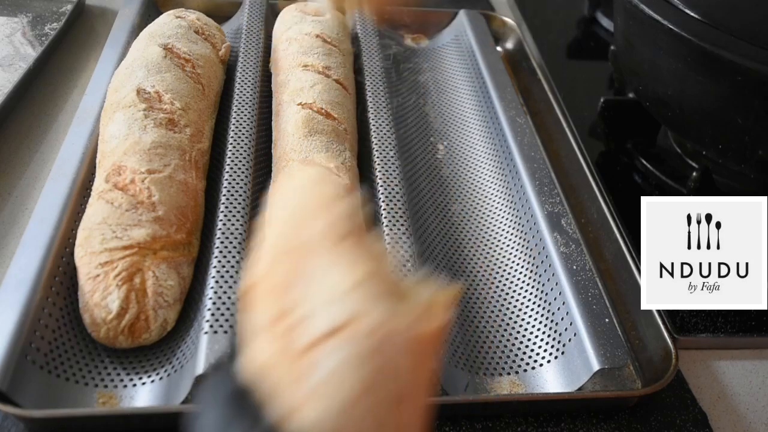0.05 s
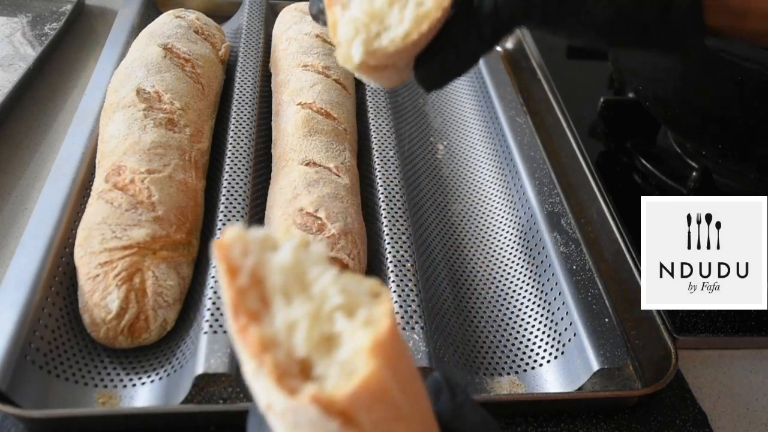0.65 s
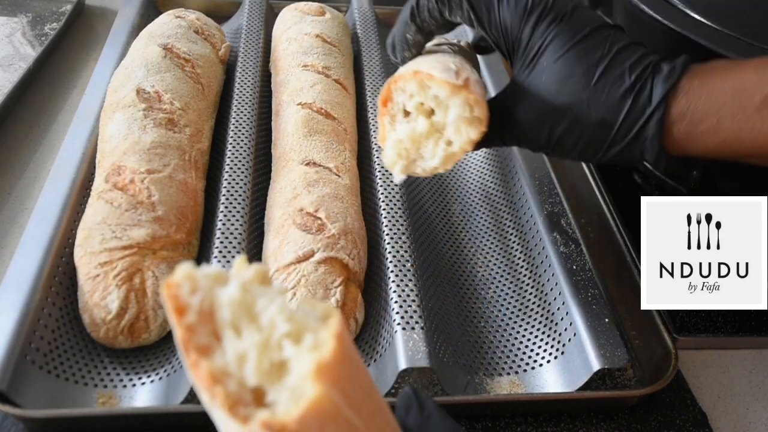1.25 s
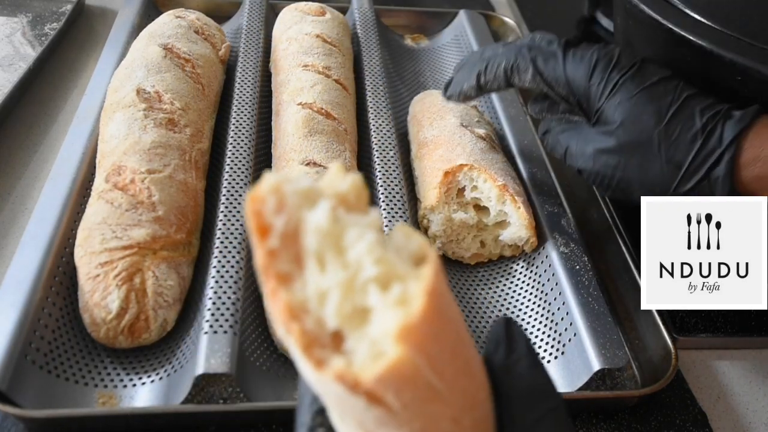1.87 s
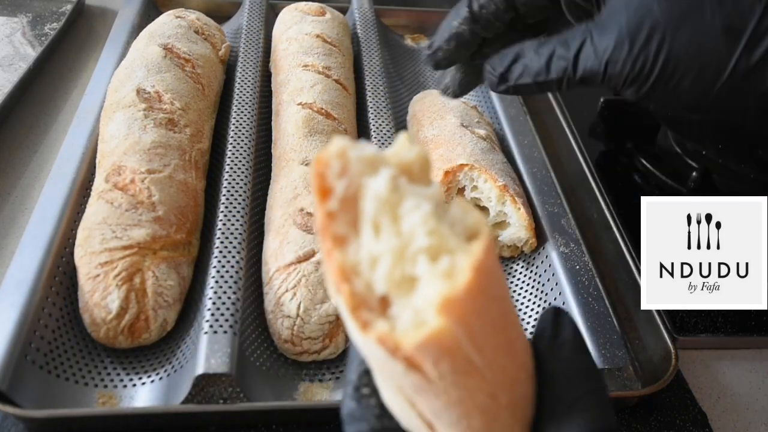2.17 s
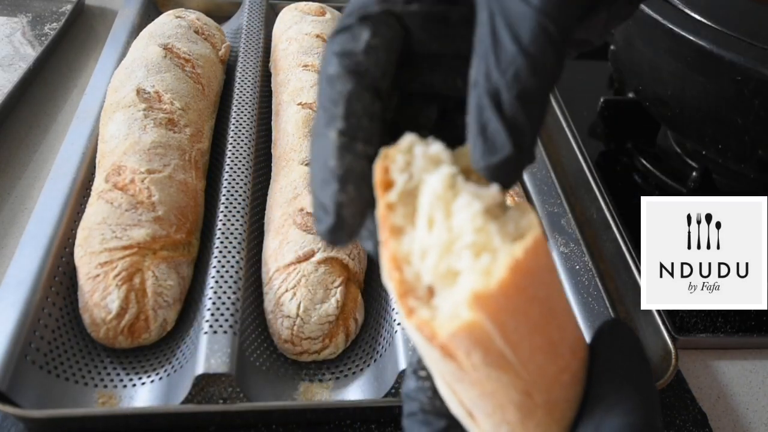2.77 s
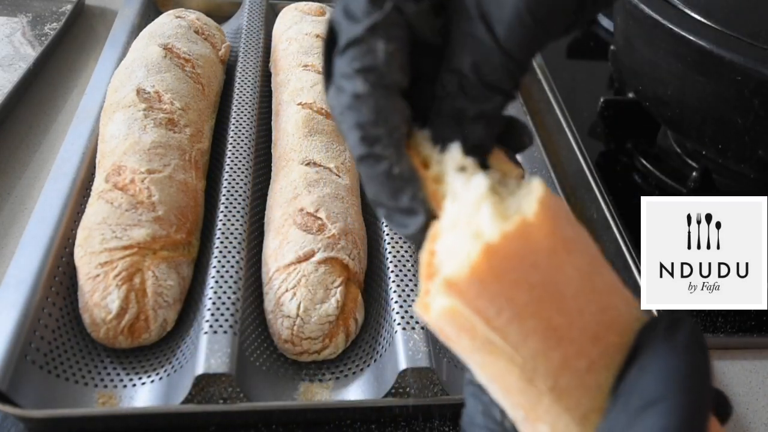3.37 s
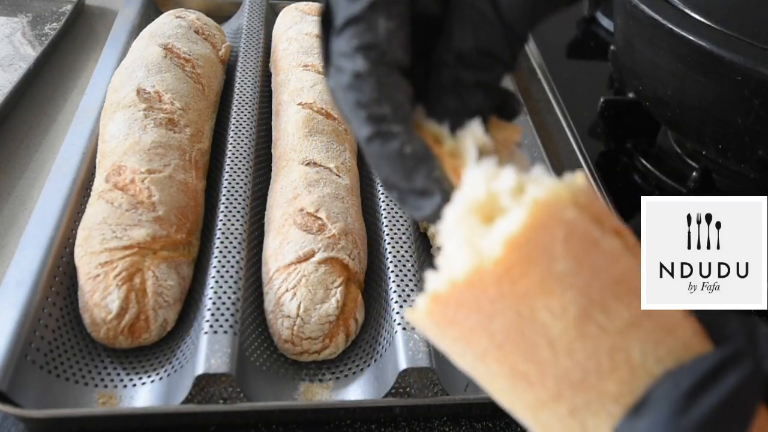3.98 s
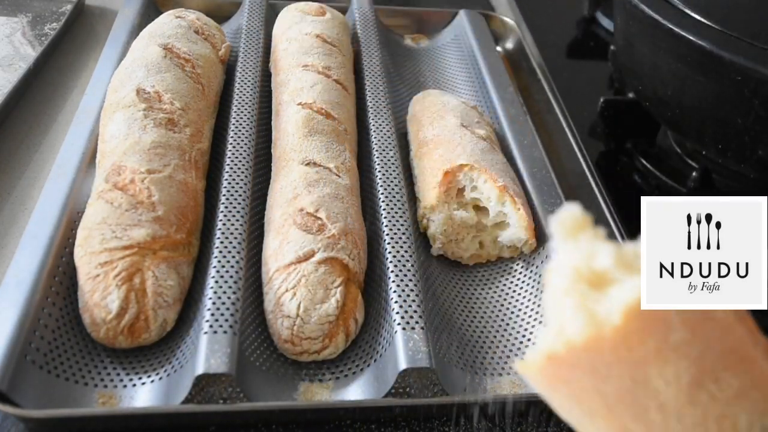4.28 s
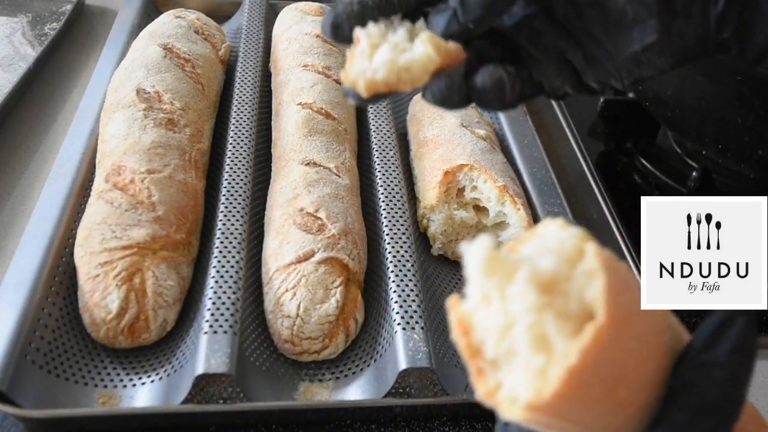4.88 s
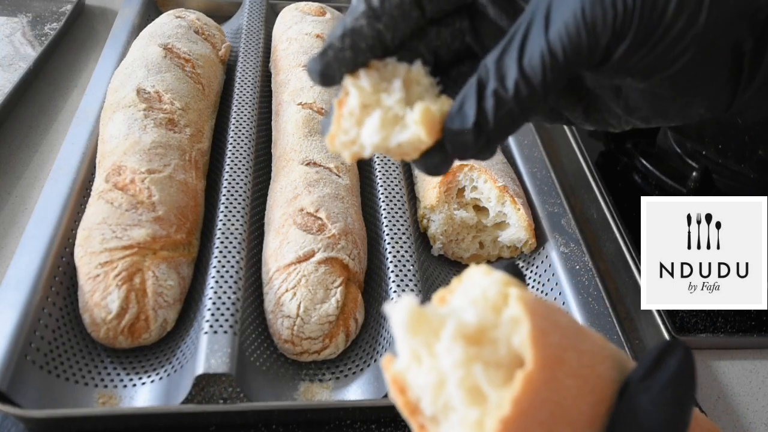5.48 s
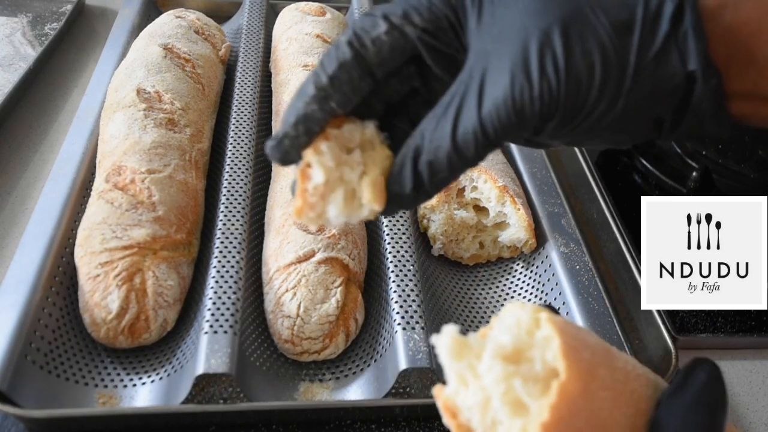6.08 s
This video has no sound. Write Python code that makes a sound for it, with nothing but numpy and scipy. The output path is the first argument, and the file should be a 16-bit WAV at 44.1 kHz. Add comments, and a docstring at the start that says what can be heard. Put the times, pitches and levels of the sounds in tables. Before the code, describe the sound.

Gloved hands handle crusty bread, starting with a sharp snap of crust and a soft rustle. A piece is set down on a perforated steel tray, which clanks loudly, rattles and rings briefly as the crust scrapes over it. Then another piece is torn off with a run of dry snaps and faint crumb crackle, followed by light glove rubbing. The microphones are close, in a quiet kitchen with a low hum.

```python
"""Crusty bread on a steel tray

A quiet kitchen with a mains hum, a stereo pair of microphones close to the hands. A piece of bread is
set down on a perforated steel tray, which clanks, rattles on the pan below and is scraped by the crust.
Gloved hands then tear off another piece: the crust snaps, the crumb crackles, the gloves rustle."""
import sys
import numpy as np
from scipy import signal
from scipy.fft import rfft, irfft
from scipy.io import wavfile
from scipy.ndimage import uniform_filter1d

SR = 44100
rng = np.random.default_rng(int(sys.argv[2]) if len(sys.argv) > 2 else 0)


def master_out(mix):
    """Clip the mix to full scale and print it as 16-bit PCM to the path in sys.argv[1]."""
    frames = np.transpose(np.atleast_2d(mix))
    ceiling = np.clip(frames, -1, 1)
    pcm = np.round(ceiling * 32767).astype(np.int16)
    wavfile.write(sys.argv[1], SR, pcm)


N = 275184
T = np.arange(N) / SR
RING_T = T[:SR]  # one second for things to ring out


# clear modes of the tray: f/Hz, level/dB, t60/s
TRAY_MODES = [(430, 6, .155), (447, -10, .45), (496, -4, .17), (667, -5, .16), (868, -12, .34),
              (944, -9, .68), (1023, -7.5, .42), (1108, -10.5, .4), (1140, -10, .2), (1246, -7, .34),
              (1285, -6.5, .48), (1338, -6, .18), (1449, 1.5, .29), (1501, -4, .12), (1585, -13, .35),
              (1655, -6, .1), (1726, 2, .24), (1749, -4, .5), (1927, -17, .55), (1955, -8.5, .15),
              (2115, -10, .18), (2354, -11, .34), (2379, -3, .26), (2445, -7, .1), (2501, -3.5, .18),
              (2600, -1, .05), (2690, -5, .08), (2791, -3.5, .15), (2858, -13, .36), (3044, -16, .3),
              (3112, -4.5, .18), (3180, -12, .4), (3315, -11, .12), (3666, -16, .3), (3714, -8, .14),
              (3788, .5, .09), (3890, 1, .085), (4295, -10, .15), (4625, -16, .18), (5416, -14, .22),
              (5500, -17, .1), (6020, -21, .18), (6510, -20, .1), (8244, -23, .14), (8400, -24, .14),
              (9283, -22, .14), (10081, -23, .14), (11535, -22, .14), (12683, -22, .14), (13181, -23, .14),
              (14180, -18, .24), (14712, -23, .12)]
def steel_ring():
    """How the tray rings after a single tap: a sum of decaying modes."""
    return unit_energy(sum((-1) ** k * undb(db) * fade(t60) * np.sin(2 * np.pi * hz * RING_T)
                           for k, (hz, db, t60) in enumerate(TRAY_MODES)))


# spectrum of the tray's crowd of weak, close modes: f/Hz, level/dB
CROWD_COLOUR = [(100, -12), (300, -13), (450, -3), (610, -5), (950, 0), (1350, -1), (1750, -4), (2200, -10),
                (2600, -5), (3400, -8), (3800, -9), (4200, -16), (9000, -15), (16000, -36)]
# blows on the tray: t/s, level/dB, rattle re blow/dB, rattle decay/s
TRAY_BLOWS = [(1.4725, -24, 14, 0.003), (1.4762, 0, -7, 0.01), (1.503, -23, 9, .008), (1.65, -25, -5, .012),
              (1.757, -20, 2.5, 0.018), (1.821, -21, 2.5, 0.11)]
# shoves of the crust along the tray: t/s, length/s, rasp/dB, drag on the steel/dB
SHOVES = [(1.474, 0.042, -29, -40), (1.54, 0.058, -39, -40), (1.609, 0.14, -31.5, -40.5),
          (1.736, 0.04, -34, -37), (1.793, 0.092, -46, -40.5)]
SHOVE_ATTACK_S = 0.0093
def tray(quick_t60, slow_db, slow_t60, chatter_db, modes_db, crowd_db):
    """Blows and dragging ring the clear modes; chatter on the pan below stirs a crowd of close ones."""
    force, rattle_power = np.zeros(N), np.zeros(N)
    for s, db, rattle_db, decay_s in TRAY_BLOWS:
        add(force, s, undb([db]))
        add(rattle_power, s, (undb(db + rattle_db) * unit_energy(np.exp(-RING_T / decay_s))) ** 2)
    # fine points of crust push too briefly to move the lowest modes
    points = band(grains(rate=2500, scatter_db=1.5), hz=2700, ratio=4.8)
    drag = together(undb(db) * stroke(s, length, SHOVE_ATTACK_S, release_s=0.015)
                    for s, length, _, db in SHOVES)
    force += drag * undb(-13) * points
    # the crowd stores the energy of each push and rings until the loaves damp it
    decay = unit_energy(fade(quick_t60) + undb(slow_db) * fade(slow_t60))
    stored = np.sqrt(np.abs(ring(rattle_power + force ** 2, decay ** 2)))
    crowd = noise(CROWD_COLOUR) * undb(chatter_db * walk(rate=150))
    return undb(modes_db) * ring(force, steel_ring()) + undb(crowd_db) * stored * crowd


# the rim meets the pan below, corner after corner: t/s, peak/dB, f/Hz, time to peak/s
RIM_CLAPS = [(1.4724, -6, 1450, 0.0023), (1.4743, -7, 2560, 0.00099), (1.4735, -14.5, 3830, 0.0017)]
def rim_claps():
    """Steel meets steel and stays there: the rim swings up within a few cycles and is choked."""
    out, t = np.zeros(N), RING_T[:SR // 20]
    for s, db, hz, peak_s in RIM_CLAPS:
        envelope = t / peak_s * np.exp(1 - t / peak_s)
        add(out, s, undb(db) * envelope * np.sin(2 * np.pi * hz * t))
    return out


# spectrum of the sliding crust: f/Hz, level/dB
RASP_COLOUR = [(500, -41), (2500, 2), (3800, 2), (4600, 6), (5050, 1), (5450, 4), (6300, 0), (7500, 0),
               (11000, -1), (14000, -6), (16000, -7)]
# the crust catches and lets go with a scratch: t/s, level/dB, t60/s
CATCHES = [(1.474, -21.5, 0.12), (1.511, -30, .05), (1.65, -23.5, 0.26), (1.756, -29, 0.072),
           (1.821, -34, 0.13)]
# spectrum of those scratches: f/Hz, level/dB
CATCH_COLOUR = [(500, -32), (2500, -4), (5000, 5), (10000, 4.5), (14500, 6), (16000, -13)]
def scrape(rasp_db, zing_db):
    """Crust sticks and slips over the perforations; its rasp and scratches make the top modes sing."""
    slips = undb(1.3 * walk(rate=120))
    sliding = together(undb(db) * stroke(s, length, SHOVE_ATTACK_S, release_s=0.037)
                       for s, length, db, _ in SHOVES)
    rasp = sliding * unit(colour(grains(rate=9000, scatter_db=-1.0), RASP_COLOUR))
    catches = np.zeros(N)
    for s, db, t60 in CATCHES:
        add(catches, s, undb(db) * fade(t60))
    contact = slips * rasp + catches * noise(CATCH_COLOUR)
    high_modes = signal.sosfilt(signal.butter(8, 4900, "high", fs=SR, output="sos"), steel_ring())
    return undb(rasp_db) * contact + undb(zing_db) * ring(contact, unit_energy(high_modes))


# snaps of the crust: t/s, level/dB, f/Hz, cycles to fall 40 dB, tick re snap/dB
CRUST_SNAPS = [(0.087, -23.5, 2550, 4.3, -14), (0.1793, -9, 2400, 4, -28), (.261, -29, 3000, 4, -5),
               (1.7577, -11, 2000, 3.4, -2), (2.224, -29.5, 3400, 2.8, 2.5), (2.581, -41, 3400, 2.3, 14),
               (2.651, -32, 2870, 3.4, -12), (2.758, -30, 2960, 4, -8), (3.009, -23, 2990, 2, -6),
               (3.0866, -9.5, 2450, 1.5, -11), (3.1646, -24, 2170, 3.4, -5), (3.2365, -22.5, 1920, 3.2, -3),
               (3.2586, -31, 3000, 4.8, 8), (3.3136, -17, 2150, 4.7, -22), (3.3953, -16, 2150, 2.4, -1.5),
               (3.4633, -21, 2800, 3.4, -10), (3.513, -34, 3400, 2, 9), (3.5428, -25.5, 2400, 2.2, 4),
               (3.643, -43, 3400, 2, 11.5), (3.7802, -29.5, 2400, 1.6, 5), (3.8340, -17.5, 1800, 2.6, 0.5),
               (3.921, -6, 1750, 1.6, -4.5), (3.9955, -13, 1450, 1.6, -18), (4.0151, -15, 1400, 1.5, -12),
               (4.0348, -12, 2500, 2, -16), (4.036, -11.5, 1080, 2.6, -27), (4.179, -18, 2200, 1.5, -7),
               (4.727, -44, 3400, 2, 11), (4.952, -26.5, 2800, 2.3, 1), (4.993, -23.5, 2900, 3.1, -4),
               (5.503, -31, 2700, 2.5, 2)]
# tone of the snaps at close range: f/Hz, gain/dB
CRUST_COLOUR = [(300, -75), (760, -24), (1010, 1.5), (1400, -2), (2000, 0.5), (3300, 5.5), (4500, 7.5),
                (6000, 8.5), (10000, 4), (16000, -3)]
SHELL_TOP_HZ = 3530  # the shell rings no higher; only the tick of the break does
def snaps(echo_s, echo_db, chip_db, chip_s):
    """A sudden break rings the crust shell for a few cycles, echoed by the tray, trailed by crumbling."""
    out, t = np.zeros(N), RING_T[:SR // 20]
    for s, db, hz, cycles, tick_db in CRUST_SNAPS:
        shell = np.sin(2 * np.pi * hz * t) * np.exp(-np.log(100) * hz * t / cycles)
        shell = signal.sosfilt(signal.butter(6, SHELL_TOP_HZ, fs=SR, output="sos"), shell)
        shell[:3] += undb(tick_db) * np.array([.5, 1, .5])
        chips = rng.standard_normal(len(t)) ** 3 * np.exp(-t / chip_s)
        crack = shell + undb(chip_db) * ring(shell, unit_energy(chips))
        add(out, s, undb(db) * crack)
        add(out, s + echo_s * rng.uniform(0.68, 1.174), undb(db + echo_db) * crack)
    return colour(out, CRUST_COLOUR)


# the fingers pull or squeeze the crumb: t/s, length/s, level as it gives/dB
CRUMB_PULLS = [(2.633, 0.24, -48), (2.853, 0.26, -43.5), (3.125, 0.19, -45), (3.301, 0.26, -45),
               (3.767, .33, -45.5), (4.09, .095, -41.5)]
def pulling(build_db=5.5):
    """Strength of the tearing: it climbs with the strain of each pull until the crumb gives."""
    pulls = []
    for s, length, db in CRUMB_PULLS:
        slack = np.clip(1 - (T - s) / length, 0, 1)
        pulls.append(undb(db - build_db * slack) * stroke(s, length, attack_s=0.02, release_s=0.034))
    return together(pulls)


# a glove rubs over the bread: t/s, length/s, glove hiss/dB, dry crust/dB
GLOVE_RUBS = [(0.006, 0.046, -44, -44), (0.123, .2, -39.5, -44.5), (.35, 0.16, -44.5, -59),
              (0.63, 0.13, -45.5, -51), (1.225, 0.083, -47, -60), (1.292, 0.044, -41, -60),
              (2.09, 0.081, -53, -53), (2.207, 0.13, -48.5, -55), (3.177, .1, -45, -61),
              (3.352, 0.044, -41.5, -44), (3.907, .07, -48.5, -52), (4.13, 0.049, -43, -50),
              (4.22, .08, -53, -55), (4.31, 0.125, -41, -47), (4.513, .22, -49, -53),
              (5.404, 0.12, -46, -53), (6.03, 0.053, -47.5, -52), (6.172, .07, -53, -53),
              (0.764, 0.27, -48.5, -57), (4.77, .2, -50, -56), (5.617, 0.11, -48.5, -57)]
def rubbing():
    """Strength of the glove hiss and of the dry crust under it."""
    hiss, dry_crust = [], []
    for s, length, glove_db, crust_db in GLOVE_RUBS:
        movement = stroke(s, length, attack_s=0.037, release_s=0.086)
        hiss.append(undb(glove_db) * movement)
        dry_crust.append(undb(crust_db) * movement)
    return together(hiss), together(dry_crust)


# crackle of the crumb: f/Hz, level/dB
CRUMB_SPECTRUM = [(400, -19), (1100, 3.5), (2100, 2), (2950, 3.5), (3700, 0), (5000, -1), (7000, -7.5),
                  (11000, -10), (16000, -37)]
# hiss of the gloves: f/Hz, level/dB
GLOVE_SPECTRUM = [(1500, -4.5), (4000, 0.5), (7000, -1.5), (10000, -4), (13000, -7.5), (16000, -15.5)]
def hands(rub_crackle, pull_crackle, grip_crackle):
    """Glove on crust swishes; the tearing crumb adds uneven spurts of small fractures."""
    unevenness = walk(rate=90)

    def friction(spectrum, crackle, rate, scatter_db):
        """Smooth rubbing blended with lone fractures; crackle is their share of the power."""
        smooth = np.sqrt(1 - crackle) * rng.standard_normal(N)
        fractures = np.sqrt(crackle) * grains(rate, scatter_db)
        return undb(4.4 * crackle * unevenness) * unit(colour(smooth + fractures, spectrum))

    crumb = lambda crackle: friction(CRUMB_SPECTRUM, crackle, rate=2000, scatter_db=2.3)
    glove = lambda crackle: friction(GLOVE_SPECTRUM, crackle, rate=1000, scatter_db=2.7)
    hiss, dry_crust = rubbing()
    grip = undb(-60.5) * glove(grip_crackle) + undb(-59.5) * crumb(grip_crackle)
    rubs = hiss * glove(rub_crackle) + dry_crust * crumb(rub_crackle)
    return rubs + pulling() * crumb(pull_crackle) + grip


# a glove crinkles as the grip shifts: t/s, length/s, level/dB, f/Hz
GLOVE_CRINKLES = [(0.138, 0.065, -44.5, 2600), (2.29, .11, -56, 13500), (2.567, .02, -48, 5500),
                  (2.62, 0.12, -53, 3860), (4.126, .025, -40.5, 3120), (4.312, 0.17, -47, 2900),
                  (5.44, 0.14, -53, 3400), (5.675, .035, -55, 13000), (6.047, 0.027, -48, 3800)]
def crinkles(attack_s, release_s):
    """A stretched glove sticks and slips in tiny jerks, each ringing the taut film at its pitch."""
    jerks = grains(rate=2200, scatter_db=2.5)
    return sum(undb(db) * stroke(s, length, attack_s, release_s) * unit(band(jerks, hz, ratio=1.16))
               for s, length, db, hz in GLOVE_CRINKLES)


# ticks of the flakes: f/Hz, level/dB
FLAKE_SPECTRUM = [(2000, -22), (5000, -2), (8000, -2), (13000, -2.5), (16000, -2)]
def flakes(gain_db):
    """Flakes of crust flick off the moving glove as sparse, thin ticks."""
    ticks = unit(colour(grains(rate=110, scatter_db=2), FLAKE_SPECTRUM))
    hiss, _ = rubbing()
    return undb(gain_db) * together([hiss, pulling() / 2]) * ticks


# soft bumps of hands and bread: middle t/s, level/dB, f/Hz, half length/s
LOAF_BUMPS = [(0.675, -47, 200, 0.0085), (1.508, -32, 450, 0.01), (1.76, -30, 550, .007),
              (1.774, -38.5, 203, 0.11), (4.184, -37.5, 365, 0.014)]
def bumps():
    """Dull, brief swells as the bread lands on the tray and as the hands handle the loaf."""
    return sum(undb(db) * unit(band(rng.standard_normal(N), hz, ratio=1.8)) * swell(s, half_length)
               for s, db, hz, half_length in LOAF_BUMPS)


# room tone of the kitchen: f/Hz, level/dB
AIR_COLOUR = [(94, -45.5), (160, -11), (235, 0), (450, -2.5), (504, -2), (555, -7), (846, -8), (930, -7),
              (1500, -15.5), (1960, -15.5), (6810, -24.5), (11900, -39), (15500, -52)]
# its steady low end: f/Hz, level/dB
BASS_COLOUR = [(15, -6), (30, 3), (70, -1.5), (140, 0), (200, -2), (400, -27.5)]
# a low rumble swells and ebbs: middle t/s, level/dB, half length/s
RUMBLE_SWELLS = [(1.08, -39.5, 0.34), (1.75, -45, 0.19)]
def kitchen():
    """An appliance hums at twice the mains frequency over soft air noise and a low rumble."""
    air, diffuse = (undb(-44.3) * noise(AIR_COLOUR) for _ in range(2))
    drift = undb(.5 * walk(rate=7))
    hum = undb(-38) * np.sqrt(2) * np.sin(2 * np.pi * 100 * T)
    bass = undb(-47.0) * noise(BASS_COLOUR)
    swells = sum(undb(db) * swell(s, half_length) for s, db, half_length in RUMBLE_SWELLS)
    rumble = swells * unit(band(rng.standard_normal(N), hz=30.3, ratio=1.17))
    return stereo(air * drift + hum + bass + rumble, undb(8.0) * diffuse)


def room(x, wet_db, side_db, t60):
    """Short reflections from worktop and walls reach the microphones from 2 ms after the direct sound."""
    responses = (rng.standard_normal(SR) * fade(t60) * (RING_T > .002) for _ in range(2))
    mid, side = (ring(x, unit_energy(response)) for response in responses)
    return stereo(x + undb(wet_db) * mid, undb(side_db) * side)


# diffuse sound in the side channel of the pair: f/Hz, gain/dB
SIDE_COLOUR = [(100, -57), (250, -54), (500, -29), (1000, -18.5), (2000, -10), (4000, -8), (8000, -4),
               (16000, 7.5)]
def stereo(mid, diffuse):
    """Close microphones hear diffuse bass alike and diffuse treble differently."""
    side = colour(diffuse, SIDE_COLOUR)
    return np.array([mid + side, mid - side])


def undb(db):
    """Decibels to gain."""
    return 10 ** (np.asarray(db) / 20)


def unit(x):
    """Scale to rms 1."""
    return x / np.sqrt(np.mean(x ** 2))


def unit_energy(x):
    """Scale a response so that it keeps the power of white noise."""
    return x / np.sqrt(np.sum(x ** 2))


def fade(t60):
    """Exponential decay, 60 dB in t60 seconds."""
    return np.exp(-np.log(1000) * RING_T / t60)


def stroke(start, length, attack_s, release_s):
    """Envelope of one movement: it speeds up, holds, and dies away."""
    return np.clip((T - start) / attack_s, 0, 1) * np.exp(-np.maximum(T - start - length, 0) / release_s)


def swell(s, half_length):
    """Bell-shaped envelope around s seconds."""
    return np.exp(-((T - s) / half_length) ** 2)


def together(envelopes):
    """Unrelated noises add by power."""
    return np.sqrt(sum(e ** 2 for e in envelopes))


def ring(x, response):
    """Convolve, keeping the length."""
    return signal.fftconvolve(x, response)[:len(x)]


def colour(x, points, size=4096):
    """Minimum-phase filter through points of f/Hz, gain/dB."""
    hz, db = np.transpose(points)
    f = np.maximum(np.arange(size // 2 + 1) * SR / size, 1)
    gain = undb(np.interp(np.log(f), np.log(hz), db))
    cepstrum = irfft(np.log(gain))
    cepstrum[1:size // 2] *= 2
    cepstrum[size // 2 + 1:] = 0
    return ring(x, irfft(np.exp(rfft(cepstrum))))


def band(x, hz, ratio):
    """Band-pass from hz / ratio to hz * ratio."""
    return signal.sosfilt(signal.butter(2, [hz / ratio, hz * ratio], "band", fs=SR, output="sos"), x)


def add(track, s, sound):
    """Mix a sound in at s seconds."""
    place = track[int(s * SR):][:len(sound)]
    place += sound[:len(place)]


def noise(spectrum):
    """Steady coloured noise; rms 1."""
    return unit(colour(rng.standard_normal(N), spectrum))


def grains(rate, scatter_db):
    """Tiny fractures of scattered size at random moments, about rate a second; rms 1."""
    sizes = undb(scatter_db * np.minimum(rng.standard_exponential(N), 4))
    moments = rng.random(N) < rate / SR
    return unit(moments * sizes * np.clip(rng.standard_normal(N), -1.5, 1.5))


def walk(rate):
    """Glide between random values, rate of them a second; rms 1."""
    hold = int(SR / rate)
    steps = np.repeat(rng.standard_normal(N)[:N // hold + 1], hold)
    return unit(uniform_filter1d(steps, hold)[:N])


def scene():
    """Tray, crust and hands close to the microphones, the kitchen behind them."""
    clank = rim_claps() + tray(quick_t60=0.22, slow_db=-6.0, slow_t60=0.72,
                               chatter_db=1.0, modes_db=18.1, crowd_db=12.4)
    steel = room(clank, wet_db=-8.0, side_db=-17, t60=0.046)
    cracks = snaps(echo_s=.0006, echo_db=-9, chip_db=-9, chip_s=.0018)
    crust = room(cracks, wet_db=-13.5, side_db=-12, t60=0.23)
    handling = hands(rub_crackle=0.3, pull_crackle=0.5, grip_crackle=0.4) + flakes(gain_db=-7)
    handling += crinkles(attack_s=0.02, release_s=0.044) + bumps() + scrape(rasp_db=0.54, zing_db=-14.5)
    rustle = room(handling, wet_db=-9, side_db=-8.0, t60=0.047)
    barely_left = undb(0.064 * np.array([[1], [-1]]))
    return steel + crust + rustle * barely_left + kitchen()


def record(dry):
    """The sound fades in, clips at full scale and loses its top."""
    opening = np.clip((T - .035) / 0.062, 0, 1)
    low_pass = signal.ellip(10, .1, 70, 15950, fs=SR, output="sos")
    return signal.sosfilt(low_pass, np.clip(dry * opening, -1, 1))


dry = scene()
out = record(dry)
master_out(out)
```